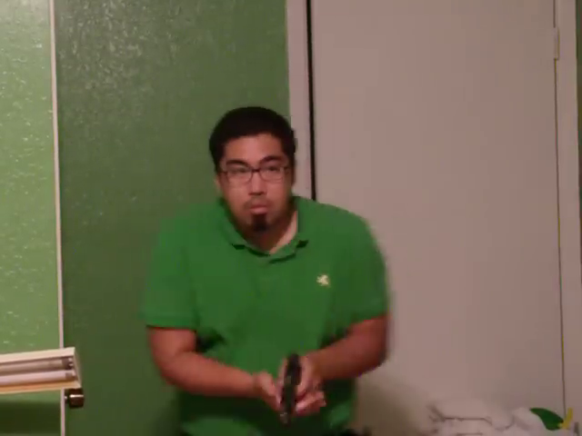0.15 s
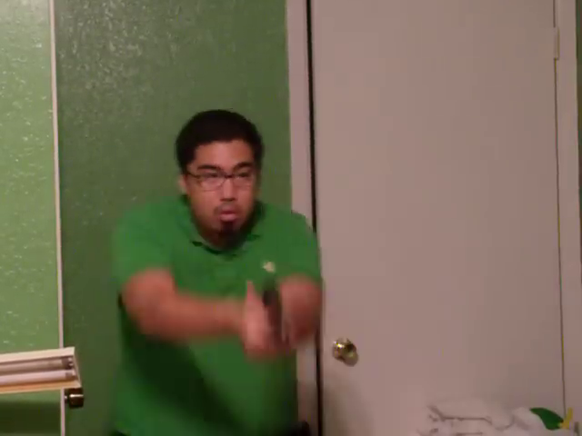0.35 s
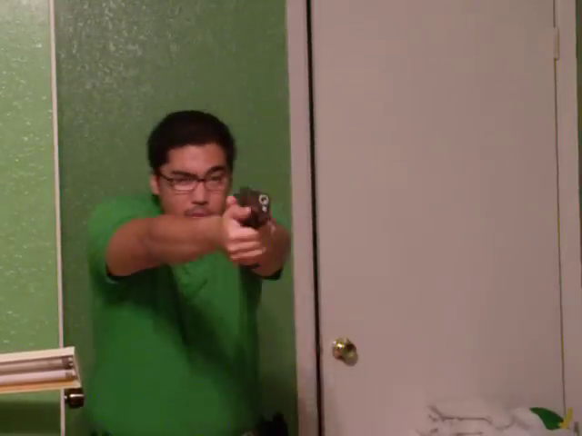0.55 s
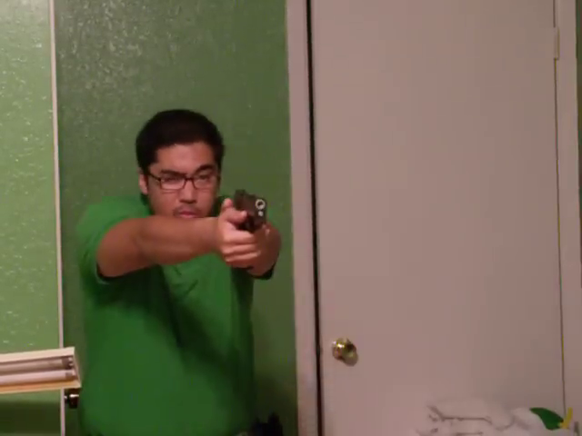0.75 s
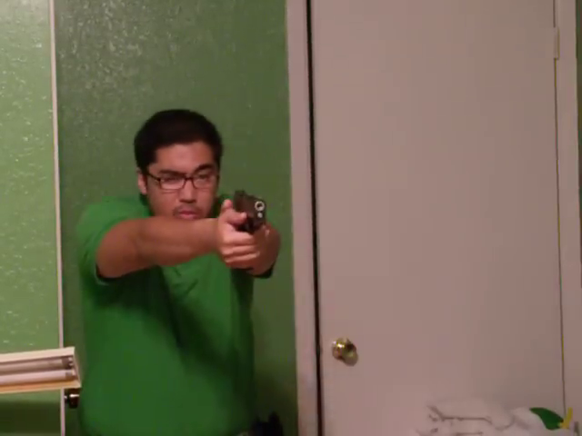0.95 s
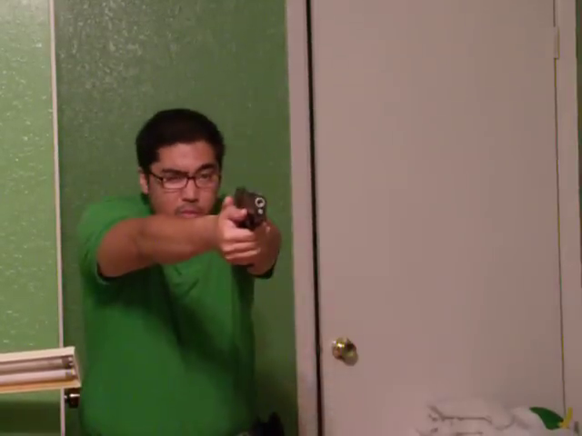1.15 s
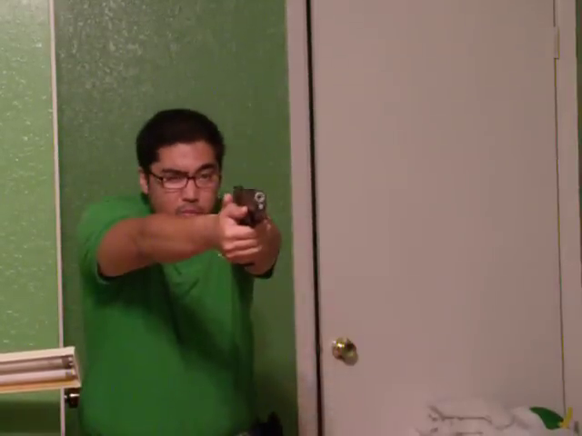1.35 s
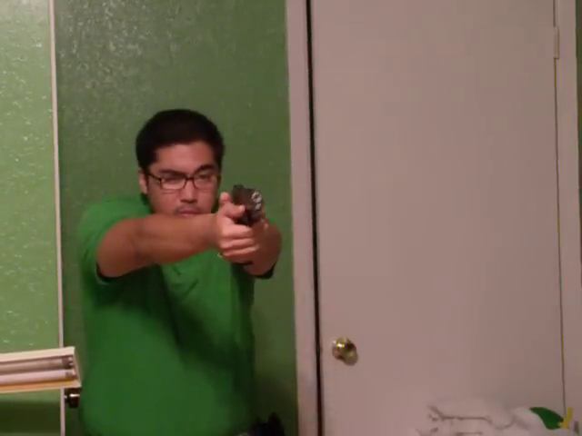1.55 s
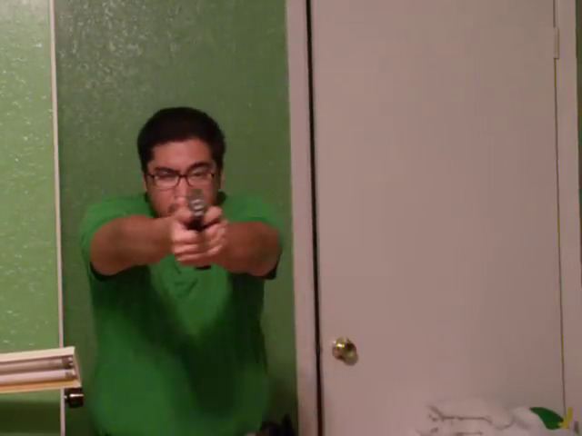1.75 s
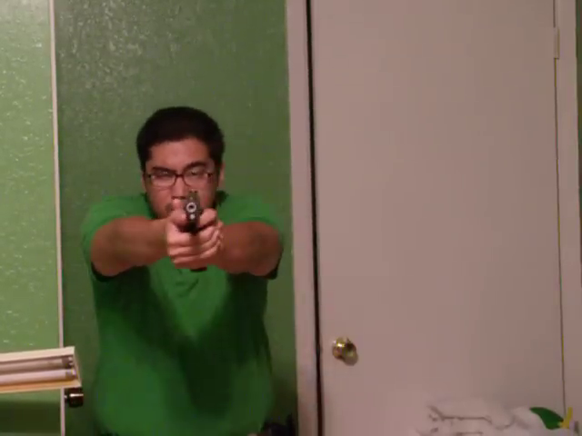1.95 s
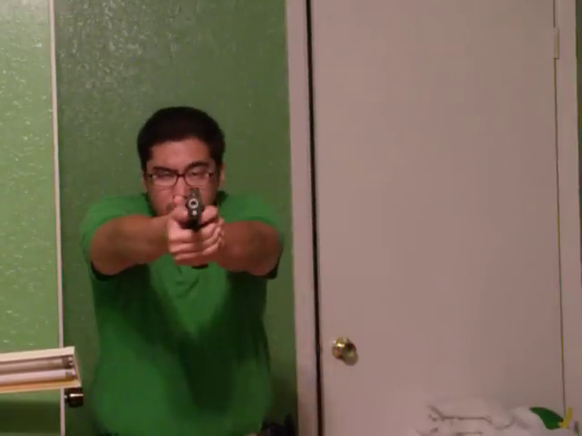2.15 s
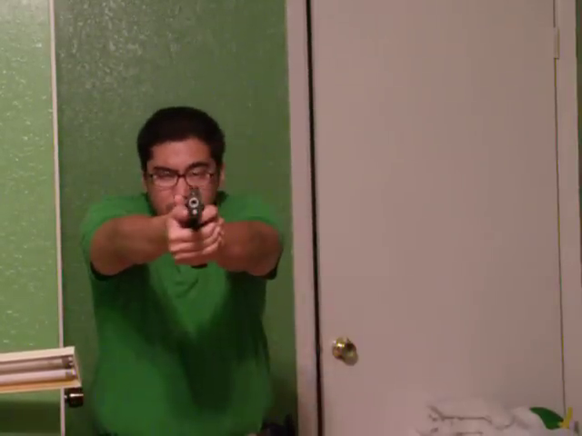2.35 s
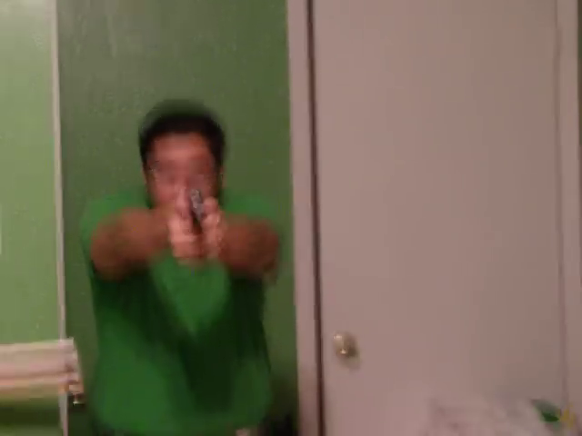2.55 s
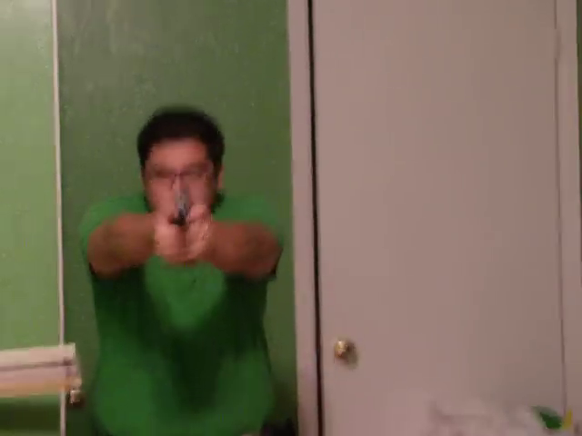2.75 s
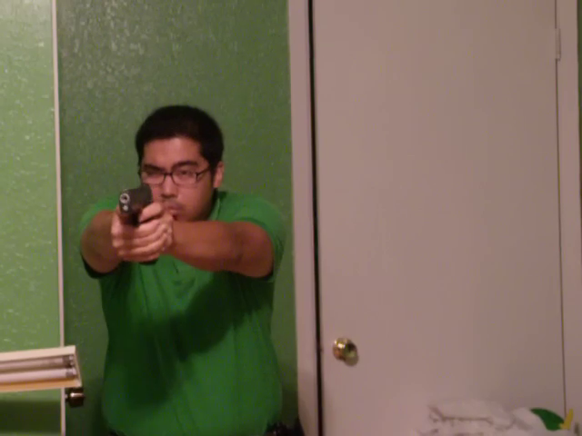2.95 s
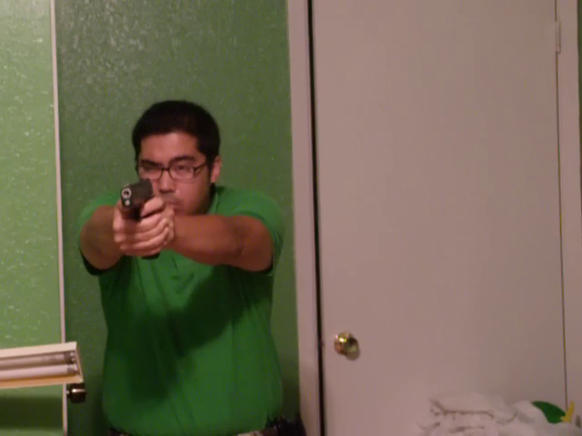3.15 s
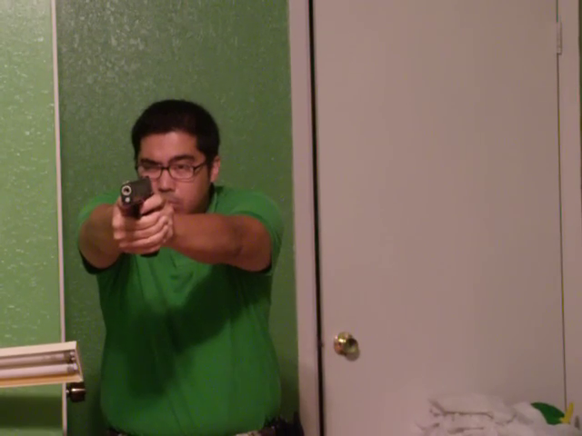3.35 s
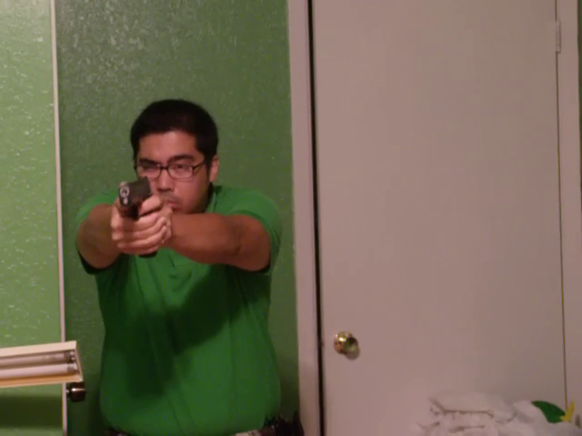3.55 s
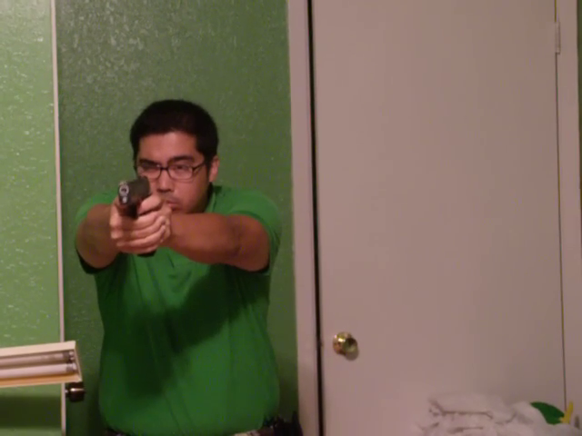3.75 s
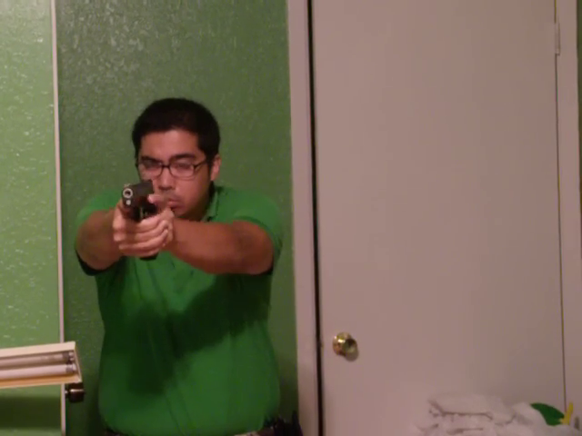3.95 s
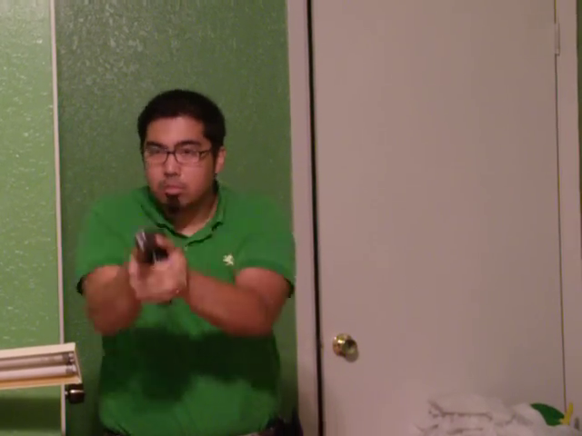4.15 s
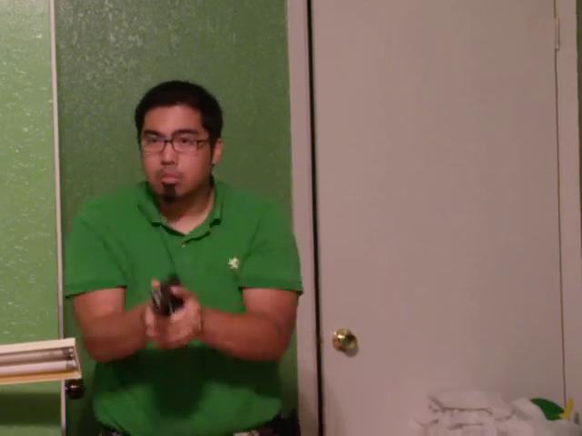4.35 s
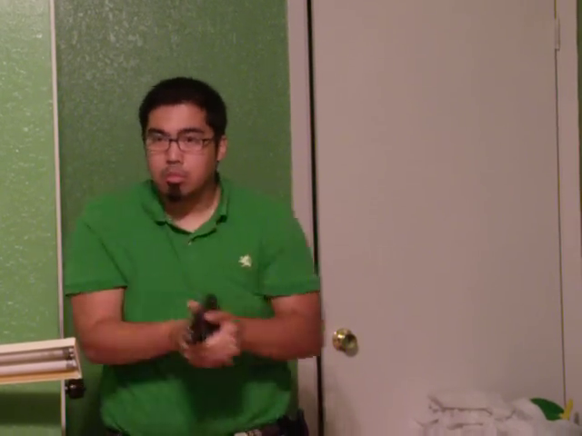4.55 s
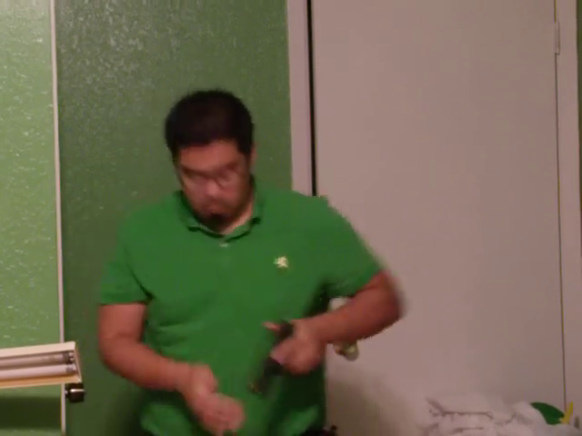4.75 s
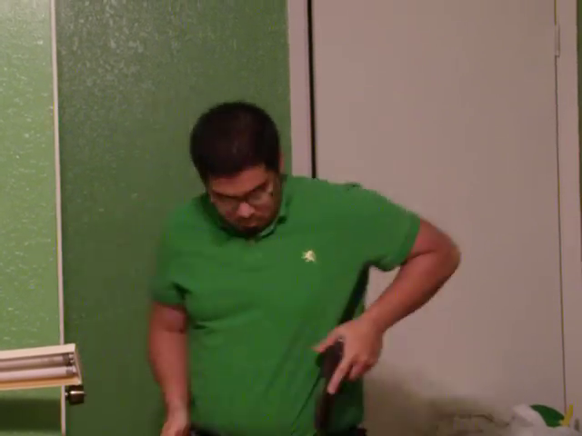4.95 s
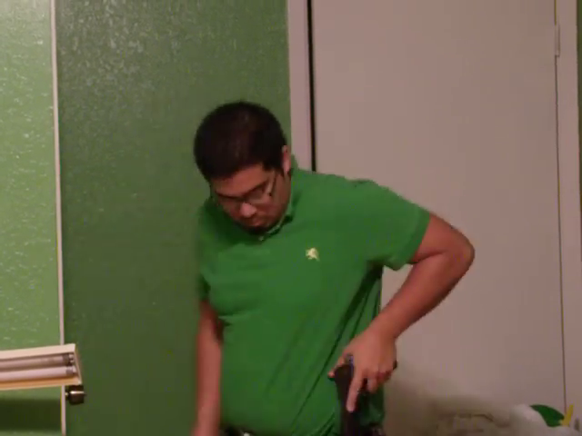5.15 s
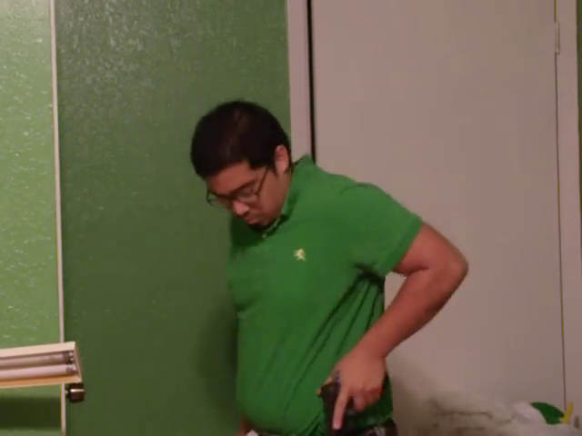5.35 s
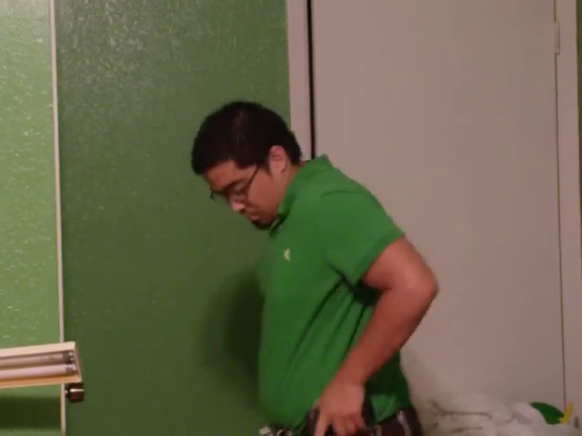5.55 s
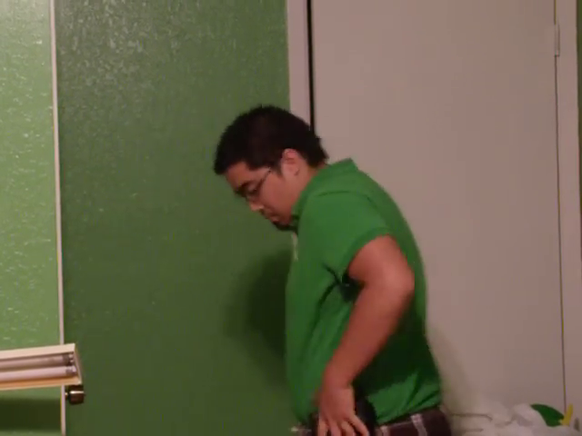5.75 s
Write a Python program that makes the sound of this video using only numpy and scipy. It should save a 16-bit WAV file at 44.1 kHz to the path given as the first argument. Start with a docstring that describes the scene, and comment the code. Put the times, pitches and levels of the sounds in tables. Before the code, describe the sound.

In a small, bare room, clothing rustles briefly as a gas airsoft pistol is drawn. It fires three quick pairs of shots about a second apart, each a sharp pop with a puff of gas and a clacking slide, ringing briefly off the walls. A few light plastic clicks follow as it is lowered and holstered. Quiet ventilation runs throughout, and the dull-sounding microphone overloads on the shots.

```python
"""A small, bare bedroom with quiet ventilation, heard through a narrow-band microphone in the room.
A gas airsoft pistol is drawn with a rustle, fires three quick pairs of shots, and is lowered and
holstered with a few clicks. Each shot is a valve crack, a puff of gas and the slide slamming back
and home; the room rings and the microphone overloads."""
import sys
import numpy as np
from scipy import signal
from scipy.fft import rfft, irfft, next_fast_len
from scipy.io import wavfile
from scipy.ndimage import uniform_filter1d

SR = 44100
rng = np.random.default_rng(int(sys.argv[2]) if len(sys.argv) > 2 else 0)


def int16_out(signal):
    """Quantize to a 16-bit WAV file."""
    q = np.round(np.clip(np.atleast_2d(signal).T, -1, 1) * 32767)
    wavfile.write(sys.argv[1], SR, q.astype(np.int16))


N = 255383
TIME = np.arange(N) / SR


def from_db(db):
    """Decibels to gain."""
    return 10 ** (np.asarray(db) / 20)


def at_hz(points, hz):
    """Read a table on a log-frequency axis."""
    freqs, values = np.transpose(points)
    return np.interp(np.log(np.maximum(hz, 1)), np.log(freqs), values)


def unit_energy(x):
    """Scale to a total energy of 1."""
    return x / np.sqrt(np.sum(x ** 2) + 1e-20)


def coloured(x, spectrum):
    """Causal (minimum-phase) filter from rows of freq_hz, gain_db."""
    size = 2 * next_fast_len(len(x) // 2 + SR // 10)
    gain = from_db(at_hz(spectrum, np.fft.rfftfreq(size, 1 / SR)))
    cepstrum = irfft(np.log(gain))
    cepstrum[1:size // 2] *= 2
    cepstrum[size // 2 + 1:] = 0
    return irfft(rfft(x, size) * np.exp(rfft(cepstrum)))[:len(x)]


def noise(spectrum, size):
    """Coloured noise of rms 1."""
    return unit_energy(coloured(rng.standard_normal(size), spectrum)) * np.sqrt(size)


def ringing(modes, t):
    """Resonances ring as decaying sines."""
    return sum(from_db(db - 60 * t / t60) * np.sin(2 * np.pi * hz * t) for hz, db, t60 in modes)


def burst(spectrum, decay_s, t, snap):
    """A sharp first impulse and noise that dies away; energy 1."""
    contact = unit_energy(rng.standard_normal(len(t)) * np.exp(-t / decay_s))
    contact[0] += snap
    return unit_energy(coloured(contact, spectrum))


def swells(events, attack_s, release_s):
    """Gain that rises exponentially to each peak and dies away after it."""
    return sum(from_db(db) * np.exp(-np.maximum((peak_s - TIME) / attack_s, (TIME - peak_s) / release_s))
               for peak_s, db in events)


def add(track, start_s, sound):
    """Mix a sound into the track."""
    start = max(round(start_s * SR), 0)
    track[start:start + len(sound)] += sound[:len(track) - start]


def ventilation(air_db=-36.5):
    """Room tone: steady air noise and rumble with faint fan tones."""
    # moving air: freq_hz, level_db
    air_spectrum = [(12, 23.5), (25, 20), (52, 15), (78, 4), (105, 10), (150, 3.5), (215, 6.5), (340, -1.5),
                    (600, 0), (1000, 0), (1500, -0.5), (2200, -5), (3600, -7), (8000, -46.5)]
    # fan tones: pitch_hz, rms_db
    fan_tones = [(220.7, -59.5), (527.6, -71.5), (791.3, -62.5), (995.9, -64.5), (1195, -70.5)]
    fan = sum(from_db(db) * np.sqrt(2) * np.sin(2 * np.pi * (hz * TIME + rng.random()))
              for hz, db in fan_tones)
    return from_db(air_db) * noise(air_spectrum, N) + fan


def room_response(tail_db=-2.5, build_s=0.0017, late_db=-22, late_stretch=2.12):
    """Bare walls return a few echoes, standing waves and a diffuse tail that dies band by band."""
    # reverberation time: centre_hz, t60_s
    room_decay = [(50, 0.31), (130, 0.34), (300, 0.28), (700, 0.44), (1300, 0.49), (2500, 0.44),
                  (3900, 0.45)]
    # standing waves: pitch_hz, level_db, t60_s
    room_modes = [(235, -79.5, 0.46), (277.7, -63.5, 0.38), (402, -69, .5), (579, -65, 0.55),
                  (690, -58, 0.27), (801.5, -60.5, 0.33)]
    # wall echoes: delay_s, level_db
    wall_echoes = [(.0045, -42), (.0095, -13), (0.02, -20), (0.023, -11), (0.033, -29.5)]
    t = TIME[:SR]
    white, hz = rfft(rng.standard_normal(SR)), np.fft.rfftfreq(SR, 1 / SR)
    centres, t60s = np.transpose(room_decay)
    tail = 0
    for band, t60 in zip(np.eye(len(centres)), t60s):
        band_noise = irfft(white * at_hz(np.c_[centres, band], hz), SR)
        loss = np.log(1000) * t / t60
        late = from_db(late_db) * np.exp(-loss / late_stretch)   # sound lingers between parallel walls
        tail = tail + band_noise * (np.exp(-loss) + late)
    build_up = 1 - np.exp(-t / build_s)
    response = from_db(tail_db) * unit_energy(tail * build_up) + ringing(room_modes, t)
    for delay_s, db in wall_echoes:
        response[round(delay_s * SR)] += from_db(db)
    return response


def in_room(sound, direct_db):
    """Direct sound plus the room at the microphone; each source position gets its own diffuse tail."""
    response = room_response()
    response[0] += from_db(direct_db)
    return signal.fftconvolve(sound, response)[:N]


def rustle(grains_per_s=900, grain_gain=0.68, hiss_gain=0.69):
    """Cloth and skin rub in fine grains; the cupped palms meet with a soft thud."""
    # rubbing cloth: freq_hz, level_db
    rub_spectrum = [(40, 0), (250, 5.5), (800, 0), (1400, -2.5), (2000, 1), (3700, -3.5), (8000, -21)]
    # sleeves brush the shirt at the draw and at a turn: peak_s, level_db
    swipes = [(.185, -28.5), (.272, -32.5), (3.05, -49)]
    # cupped palms: freq_hz, level_db
    palm_spectrum = [(40, -22), (160, -22.5), (225, 7.5), (285, -4), (350, 0), (480, 2), (650, -11),
                     (1200, -23), (8000, -43)]
    # hands meet on the grip, later the stance shifts: peak_s, level_db
    thuds = [(.168, -28), (.205, -22), (2.99, -30.5), (3.05, -37.5), (3.105, -41)]
    impulses = (rng.random(N) < grains_per_s / SR) * rng.standard_normal(N)
    grains = unit_energy(coloured(impulses, rub_spectrum)) * np.sqrt(N)
    rub = grain_gain * grains + hiss_gain * noise(rub_spectrum, N)
    sleeves = swells(swipes, attack_s=0.061, release_s=0.033) * rub
    palms = swells(thuds, attack_s=0.0066, release_s=0.014) * noise(palm_spectrum, N)
    return sleeves + palms


def clicks(snap_s=0.0037):
    """Short plastic contacts, each through one broad resonance; the briefer, the sharper."""
    # grip, catch and holster: start_s, level_db, centre_hz, width_hz, decay_s
    contacts = [(0.001, 2.5, 2350, 4500, 0.0059), (4.074, 5.5, 1360, 2720, 0.0024),
                (4.094, -1.5, 1700, 1400, .003), (4.177, 0, 1577, 1970, 0.0086),
                (4.434, 3, 1350, 950, 0.0024), (4.514, 3.5, 1128, 1780, 0.0044),
                (4.533, -11, 1610, 2600, 0.0018), (5.217, 5.5, 2050, 955, 0.007),
                (5.249, -2, 1950, 600, .003), (5.389, -8, 1600, 1800, 0.0092),
                (5.603, 4, 2720, 3800, 0.0084)]
    # plastic on plastic: freq_hz, level_db
    plastic_spectrum = [(40, -18), (250, 11), (800, 1.5), (1500, -2), (2400, -5), (3700, -6), (8000, -24)]
    out, t = np.zeros(N), TIME[:SR // 10]
    for start_s, db, centre_hz, width_hz, decay_s in contacts:
        contact = burst(plastic_spectrum, decay_s, t, snap=snap_s / decay_s)
        radius = np.exp(-np.pi * width_hz / SR)
        feedback = [1, -2 * radius * np.cos(2 * np.pi * centre_hz / SR), radius * radius]
        body = signal.lfilter([1, 0, -1], feedback, contact)
        add(out, start_s, from_db(db) * unit_energy(body))
    return out


def slide_blow(ring_db, t, chatter_s=0.0044):
    """The slide chatters against a stop and rings."""
    # slide impact: freq_hz, level_db
    slide_spectrum = [(30, -10), (180, -14), (400, -11), (680, 0.5), (900, -5.5), (1150, 3.5), (1500, 1),
                      (2200, 2), (3600, 1.5), (5000, 5), (8000, -14)]
    # slide resonances: pitch_hz, level_db, t60_s
    slide_modes = [(2130, -33.5, .008), (2790, -5, .01), (3200, -4, 0.0053), (3610, 6.5, 0.0041),
                   (3738, 7.5, 0.0096)]
    contact = burst(slide_spectrum, chatter_s, t, snap=1.67)
    ring = unit_energy(signal.fftconvolve(contact, ringing(slide_modes, t))[:len(t)])
    return unit_energy(contact + from_db(ring_db) * ring)


def pistol(crack_s=0.0078, puff_s=0.021, hammer_lead_s=0.0026, hammer_db=-31, frame_db=-3, direct_db=-8):
    """Hammer tick, valve crack, swelling gas, two slide blows; each from its own spot on the gun."""
    # shots, with the slide hitting its rear stop (back) and closing (home):
    # start_s, crack_db, puff_db, back_delay_s, back_db, home_delay_s, home_db, ring_db
    shots = [(1.3571, 30.5, 33.5, 0.035, 33, 0.068, 31, -10),
             (1.533, 29, 31.5, 0.03, 33.5, 0.063, 27.5, -12),
             (2.485, 31, 29.5, 0.042, 28.5, 0.054, 33.5, -18), (2.647, 29, 29, 0.04, 29.5, 0.078, 26.5, -7),
             (3.5066, 29, 28, .022, 24.5, .060, 26.5, 1.5), (3.696, 29, 27, .028, 22.5, 0.07, 25, -2.5)]
    # valve crack: freq_hz, level_db
    crack_spectrum = [(30, -7.5), (150, -2), (300, -1.5), (700, 1), (1500, -2.5), (2500, -7), (3600, -0.5),
                      (5000, 0.5), (8000, -27.5)]
    # escaping gas: freq_hz, level_db
    puff_spectrum = [(25, -2.5), (80, -5), (125, -8.5), (185, -11.5), (245, 0), (290, 6), (360, 0),
                     (490, 3.5), (620, -0.5), (790, -1), (1100, -11.5), (3000, -6.5), (8000, -26.5)]
    out, t = np.zeros(N), TIME[:SR // 5]
    flow = t / puff_s * np.exp(-.5 * (t / puff_s) ** 2)   # gas vents while the slide travels
    for start_s, crack_db, puff_db, back_delay_s, back_db, home_delay_s, home_db, ring_db in shots:
        parts = [(-hammer_lead_s, crack_db + hammer_db, slide_blow(ring_db, t)),
                 (0, crack_db, burst(crack_spectrum, crack_s, t, snap=1.74)),
                 (0, crack_db + frame_db, slide_blow(ring_db, t)),   # the gas kicks the slide loose
                 (0, puff_db, unit_energy(noise(puff_spectrum, len(t)) * flow)),
                 (back_delay_s, back_db, slide_blow(ring_db, t)),
                 (home_delay_s, home_db, slide_blow(ring_db, t))]
        for delay_s, db, sound in parts:
            add(out, start_s + delay_s, from_db(db) * in_room(sound, direct_db))
    return out


def scene(pistol_gain_db=3):
    """Shots and handling over the room tone, in mono at the microphone."""
    gunfire = from_db(pistol_gain_db) * pistol()
    handling = in_room(clicks() + rustle(), direct_db=-6)
    return (gunfire + handling + ventilation())[None]


def gain_control(x, limit_db=1.5, release_db_per_s=70, loud_db=-14, back_off_db=8.0, back_off_s=0.64):
    """A fast limiter holds peaks down; the gain also backs off, and stays down, as loud time adds up."""
    level_db = 10 * np.log10(np.abs(uniform_filter1d(x ** 2, size=220)) + 1e-12)   # 5 ms window
    loud_s = np.cumsum(level_db > loud_db) / SR
    slow_db = back_off_db * (1 - np.exp(-loud_s / back_off_s))
    over_db = np.maximum(level_db - slow_db - limit_db, 0)
    release_db = release_db_per_s * TIME
    fast_db = np.maximum.accumulate(over_db + release_db) - release_db
    return x * from_db(-slow_db - fast_db)


def record(dry, preamp_top=0.88, ceiling=0.73, cutoff_hz=16000):
    """Gain control, saturating preamp, narrow band, then clipping whose crackle is the only treble."""
    # narrow-band microphone: freq_hz, gain_db
    mic_response = [(10, -3.5), (3650, 0.5), (3950, -1), (4220, -8), (4460, -23.5), (4800, -51.5),
                    (5300, -84.5)]
    driven = preamp_top * np.tanh(gain_control(dry[0]) / preamp_top)
    clipped = np.clip(coloured(driven, mic_response), -ceiling, ceiling)
    lowpass = signal.ellip(10, .1, 80, cutoff_hz, fs=SR, output="sos")
    return signal.sosfilt(lowpass, clipped)[None]


dry = scene()
out = record(dry)
int16_out(out)
```